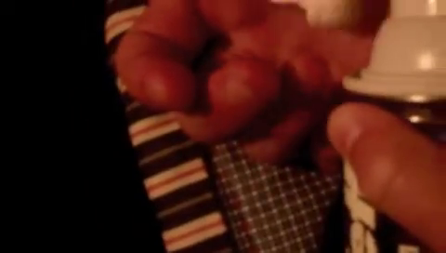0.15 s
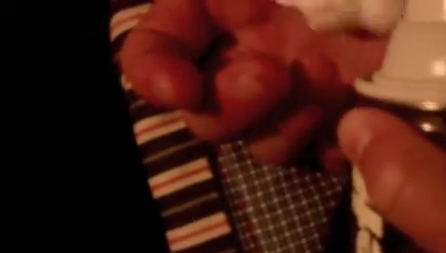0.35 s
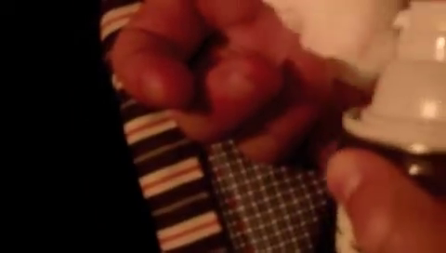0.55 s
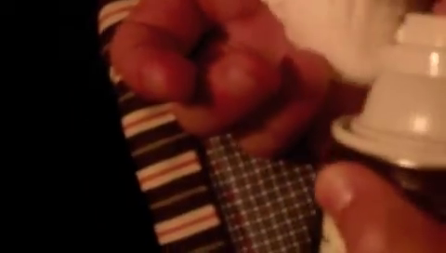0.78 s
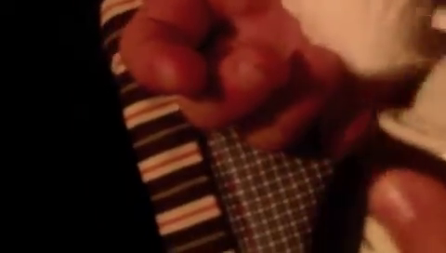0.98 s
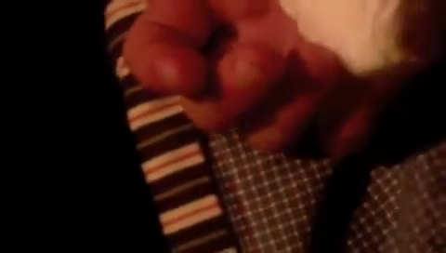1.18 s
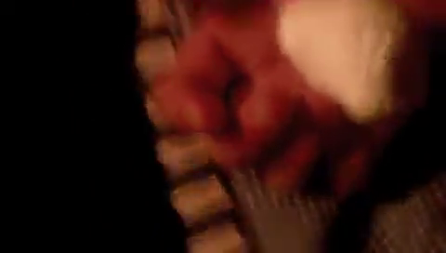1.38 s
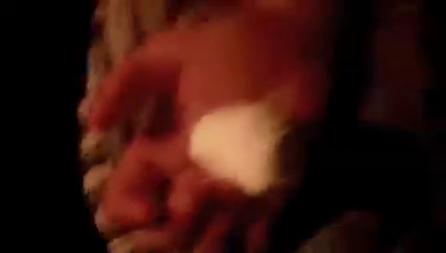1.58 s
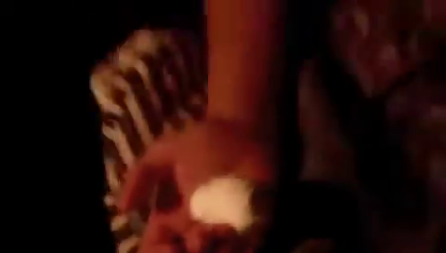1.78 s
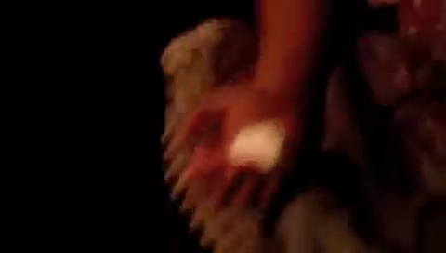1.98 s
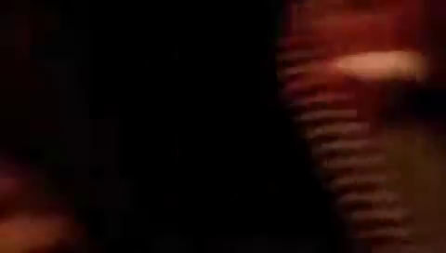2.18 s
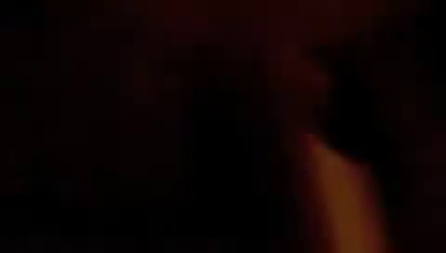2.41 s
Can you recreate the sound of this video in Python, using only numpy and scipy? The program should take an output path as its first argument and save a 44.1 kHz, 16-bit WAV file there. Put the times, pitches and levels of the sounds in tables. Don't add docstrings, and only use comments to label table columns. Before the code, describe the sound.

A can's cap clicks, then foam hisses and splutters out briefly, leaving quiet room noise and ticks

```python
import sys
import numpy as np
from scipy import signal
from scipy.io import wavfile
from scipy.ndimage import uniform_filter1d

SR = 44100
rng = np.random.default_rng(int(sys.argv[2]) if len(sys.argv) > 2 else 0)


def how_loud(loudness_db):
    steps = np.asarray(loudness_db, float) / 20
    return 10 ** steps


def materialize(psi):
    bounded = np.clip(np.atleast_2d(psi).T, -1, 1)
    quanta = np.round(bounded * 32767).astype(np.int16)
    wavfile.write(sys.argv[1], SR, quanta)


N = 108045
T = np.arange(N) / SR

# (bare frequency [Hz], buried frequency [Hz], width [Hz], bare level [dB], buried level [dB])
SPOUT_MODES = [(500, 704, 99, -23, -21), (1107, 820, 211, 2, -1), (1530, 1240, 79, -13.5, 3.5),
               (1600, 1630, 140, -26, -15), (2336, 1996, 278, 2, -1), (2400, 2550, 690, -14, -7.5),
               (2915, 2985, 250, -14.5, -8.5), (3900, 3860, 265, -15, -10.5)]
PILE_SPAN = 0.37, 0.8
FLOW_TIMES = [
    .337,
    .4,
    .47,
    .6,
    .75,
    .903,
    .927,
    .945,
    .965,
]
FLOW_LEVELS = [-17, -12.5, -15, -13.5, -14, -14, -32, -34, -62]
SPIT_TIMES = [.4, .419, .46, .514, .558, .582, .602, .74, .777, .84, .896]
# (boost [dB], length [s], brightness [dB])
SPIT_SHAPES = [(5, .014, 1), (4, .005, 0), (3, .006, -2), (1, .008, 1), (1, .008, 2), (0, .006, 3),
               (6, .008, -3), (3, .014, 7), (3, .004, 3), (0, .012, 4), (0, .022, 9)]
# (time [s], level [dB])
GAS_FLOW = [(.085, -75), (.115, -42), (.155, -52), (.178, -37), (.3, -35), (.345, -30.5), (.57, -25.5),
            (.7, -28.5), (.905, -30.5), (.935, -65.5), (.97, -67)]
# (frequency [Hz], width [Hz], leaking level [dB], spraying level [dB])
VALVE_MODES = [(2280, 1500, 1, -14), (3290, 260, 2, -18), (4330, 1600, 4, -10), (5217, 690, 7, 11.5),
               (6500, 500, -17, -11), (7100, 1190, 5, 7), (8070, 1020, -1, 1.5), (9870, 1300, -26, -9),
               (11000, 1500, -5, -25), (12600, 2900, -8.5, -50), (14600, 3600, -24, -12)]
WETTING_SPAN = 0.31, 0.33
# (frequency [Hz], width [Hz], level [dB])
CAP_MODES = [(792, 320, 5), (1250, 350, 1), (2180, 1040, 6), (2430, 770, -13.5), (4200, 1800, -3),
             (4960, 540, 0.5), (7000, 1300, -1.5), (7700, 490, -1), (11300, 3200, -31), (16000, 3000, -7)]
# (frequency [Hz], width [Hz], bare share [0-1], buried share [0-1])
HAND_NOTCHES = [(1700, 250, 0.97, 0.13), (3295, 50, 0.55, .6), (5510, 280, 0.42, .6)]
# (frequency [Hz], reverberation time [s])
ROOM_DECAY = [(500, 0.4), (2000, 0.2), (8000, 0.17)]
TICK_TIMES = [.982, 1.024, 1.37, 1.371, 1.457, 1.475, 1.49, 1.51, 1.527, 2.143, 2.145, 2.198, 2.1982, 2.318,
              2.33, 2.35, 2.41]
# (level [dB], frequency [Hz], width [Hz])
TICK_COLOURS = [(-40, 7200, 4000), (-41, 6500, 2000), (-39, 1300, 500), (-34.5, 2100, 900),
                (-46, 3900, 900), (-45, 6800, 900), (-39, 3800, 750), (-40, 3900, 900), (-48, 3500, 900),
                (-35.5, 6000, 3000), (-42, 2810, 340), (-35, 9200, 4000), (-39, 13800, 4000),
                (-37, 900, 800), (-32, 500, 400), (-40, 7500, 2500), (-45, 7000, 1700)]
# (middle [s], length [s], level [dB], frequency [Hz], width [Hz])
RUSTLE_GRAINS = [(1.185, 0.38, -51, 1575, 500), (1.25, 0.58, -65, 5730, 700),
                 (1.462, 0.017, -47, 1120, 800), (1.483, 0.037, -62.5, 3900, 900),
                 (1.708, 0.084, -50.5, 1620, 700), (1.718, 0.1, -60, 5140, 5000),
                 (1.833, 0.33, -55.5, 326, 300), (2.245, .15, -62, 2730, 600),
                 (2.334, 0.03, -58, 3900, 800), (0.097, 0.3, -52.5, 927, 860),
                 (0.038, 0.11, -61, 3280, 397), (0.973, 0.13, -47, 1620, 1500), (1.9, 1, -68.5, 2980, 500),
                 (2.21, 0.27, -55.5, 905, 890)]
# (frequency [Hz], level [dB])
HUM_COLOUR = [(15, -40), (40, -4.5), (110, 0), (300, -6), (1600, -17), (8000, -30), (12000, -36),
              (14800, -34)]


def foam(froth_db, bright_db):
    jet = rng.standard_normal(N) * how_loud(froth_db)
    out = np.zeros(N)
    for bare_hz, buried_hz, width, bare_db, buried_db in SPOUT_MODES:
        pile = ramp(PILE_SPAN) ** (.75 if bare_hz < 1700 else 1.1)
        hz = bare_hz + (buried_hz - bare_hz) * pile
        hz = hz * (1 + 0.0091 * chance(0.018))
        brightening = bright_db * np.clip((bare_hz - 1500) / 1600, 0, 1.3)
        db = bare_db + (buried_db - bare_db) * pile + 2 * chance(0.011) + brightening
        out += steep(jet * how_loud(db), hz, 1.51 * width)
    opening_db_per_s = 1050
    flow_db = np.interp(T, FLOW_TIMES, FLOW_LEVELS)
    flow_db = flow_db + opening_db_per_s * np.minimum(T - FLOW_TIMES[0], 0)
    return how_loud(flow_db) * (T > .28) * (T < .97) * evened(out)


def sputter():
    flutter_db = 2.5 * chance(0.0016)
    surge_db = .8 * chance(.012)
    boost_db, bright_db = np.zeros(N), np.zeros(N)
    for s, (boost, length, brightness) in zip(SPIT_TIMES, SPIT_SHAPES):
        spit = bump(s, length)
        boost_db += boost * spit
        bright_db += brightness * spit
    return flutter_db + surge_db + boost_db, bright_db


def gas(froth_db, bright_db):
    gate = how_loud(0.85 * froth_db + 0.12 * bright_db)
    wet = ramp(WETTING_SPAN)
    hiss = np.zeros(N)
    for hz, width, leaking_db, spraying_db in VALVE_MODES:
        db = leaking_db + (spraying_db - leaking_db) * wet + 2.14 * chance(0.03)
        wandering_hz = hz * (1 + 0.014 * chance(0.067))
        hiss += how_loud(db) * steep(gate * rng.standard_normal(N), wandering_hz, width)
    return how_loud(curve(GAS_FLOW) + 1.5) * (T > .08) * (T < .97) * hiss


def snap():
    start_s, length_s, level_db, after_db = .1641, 0.0026, -11, -13.5
    u = (T - start_s) / length_s
    envelope = np.clip(6 * u, 0, 1) * np.exp(-np.clip(u, 0, 3) ** 4) * (u < 3)
    crackle = rng.standard_normal(N) * envelope
    body = sum(how_loud(db) * steep(crackle, hz, 1.5 * width) for hz, width, db in CAP_MODES)
    body = body / np.sqrt(np.sum(body ** 2) / (length_s * SR))
    after = steep(rng.standard_normal(N), 1380, 350) * bump(start_s + .0158, .007)
    return how_loud(level_db) * (body + how_loud(after_db) * after / abs(after).max())


def hand(x):
    for hz, width, bare, buried in HAND_NOTCHES:
        share = np.clip(bare + (buried - bare) * ramp(PILE_SPAN) ** 2, 0, 1)
        x = x - share * resonate(x, hz, width)
    return x


def room(x):
    taps = np.zeros(SR // 2)
    at = np.arange(120, len(taps) - 20, 20)
    taps[at + rng.integers(0, 20, len(at))] = rng.choice([-1., 1.], len(at))
    hz, t, z = signal.stft(taps, SR, nperseg=256)
    decay = how_loud(-60 * t / read(ROOM_DECAY, hz)[:, None])
    tail = signal.istft(z * decay, SR, nperseg=256)[1]
    return signal.fftconvolve(x, tail / np.linalg.norm(tail))[:N]


def ticks():
    out = np.zeros(N)
    for s, (db, hz, width) in zip(TICK_TIMES, TICK_COLOURS):
        tick = steep(bump(s, .00004), hz, width)
        out += how_loud(db) * tick / abs(tick).max()
    return out


def rustles():
    out = np.zeros(N)
    for s, length, db, hz, width in RUSTLE_GRAINS:
        grain = evened(steep(rng.standard_normal(N), hz, width))
        out += how_loud(db + 1.4 * chance(0.0041)) * bump(s, length) * grain
    return out


def hum():
    frames, hz = N // 256 + 5, np.fft.rfftfreq(1024, 1 / SR)
    a, b, patches = rng.standard_normal((frames, 513, 3)).T
    patches = evened(uniform_filter1d(uniform_filter1d(patches, 14, 0), 12, 1))
    z = (a + 1j * b) * how_loud(read(HUM_COLOUR, hz)[:, None] + 1.2 * patches)
    noise = signal.istft(z, nperseg=1024, noverlap=768)[1][:N]
    return how_loud(-45) * evened(noise)


def resonate(x, hz, width):
    turn = np.exp(2j * np.pi * np.cumsum(hz * np.ones(len(x))) / SR)
    r = np.exp(-np.pi * width / SR)
    smooth = signal.lfilter([1 - r], [1, -r], x / turn + 1e-18)
    return 2 * (turn * smooth).real


def steep(x, hz, width):
    return resonate(resonate(x, hz, width), hz, width)


def chance(seconds):
    size = max(round(seconds * SR), 2)
    return evened(uniform_filter1d(uniform_filter1d(rng.standard_normal(N), size), size))


def bump(s, length):
    return np.exp(-.5 * (2 * (T - s) / length) ** 2)


def ramp(span):
    return np.clip((T - span[0]) / (span[1] - span[0]), 0, 1)


def curve(points):
    return np.interp(T, *np.transpose(points))


def read(points, hz):
    f, value = np.transpose(points)
    return np.interp(np.log(hz + 1), np.log(f + 1), value)


def evened(x):
    return x / np.sqrt(np.mean(x ** 2) + 1e-20)


def scene():
    froth_db, bright_db = sputter()
    can = foam(froth_db, bright_db) + gas(froth_db, bright_db) + snap()
    bass_cut = signal.butter(2, 194, "high", fs=SR, output="sos")
    can = signal.sosfilt(bass_cut, can)
    return (hand(can) + how_loud(-16) * room(can) + ticks() + rustles() + hum())[None]


def top_cut(x):
    return signal.sosfilt(signal.butter(12, 16470, fs=SR, output="sos"), x)


def record(dry):
    limited = 1.5 * np.tanh(dry / 1.5)
    band_edge = signal.firwin(1501, 15290, window=("kaiser", 9), fs=SR)
    mix = signal.oaconvolve(limited, band_edge[None], "same")
    return top_cut(mix)


dry = scene()
out = record(dry)
materialize(out)
```